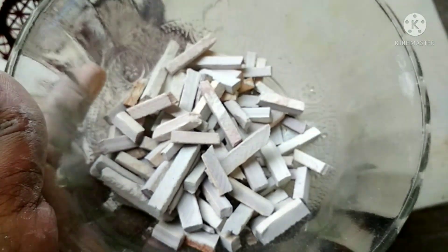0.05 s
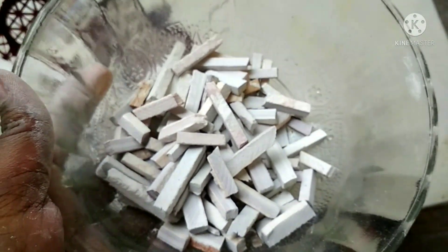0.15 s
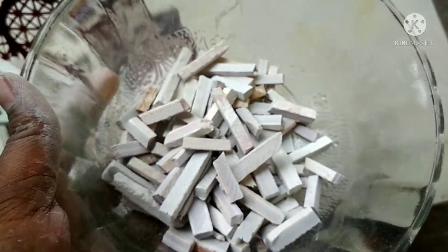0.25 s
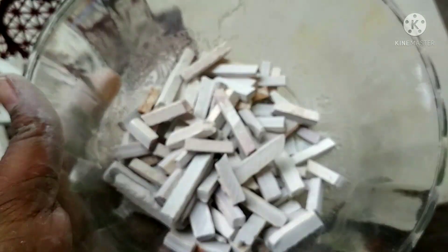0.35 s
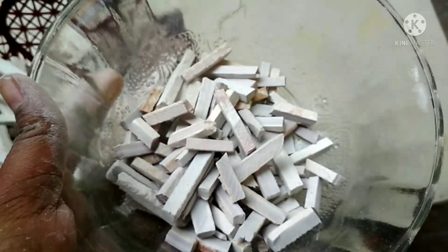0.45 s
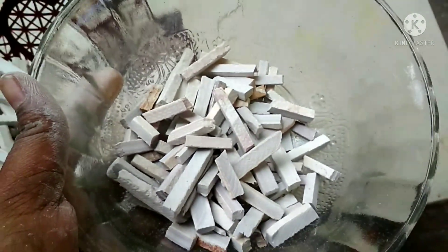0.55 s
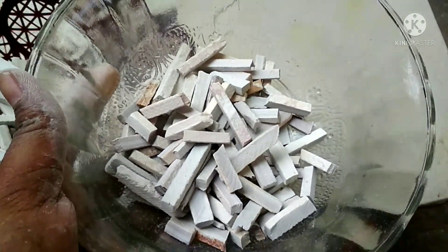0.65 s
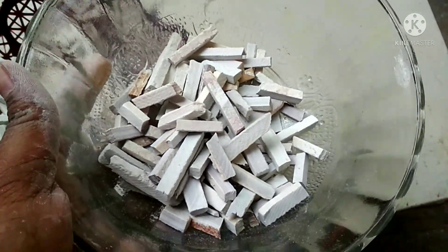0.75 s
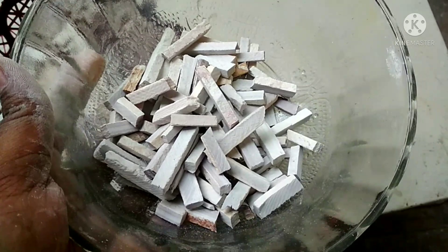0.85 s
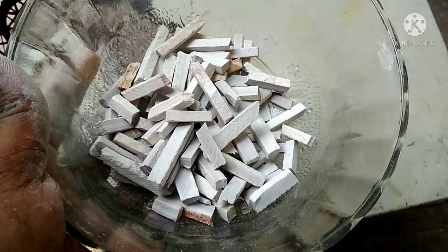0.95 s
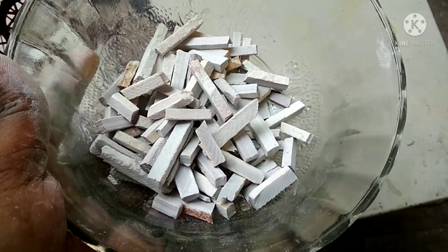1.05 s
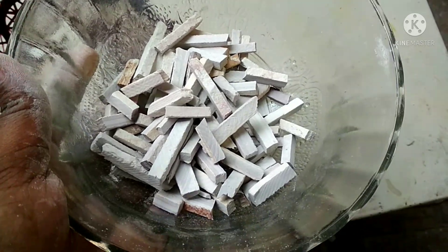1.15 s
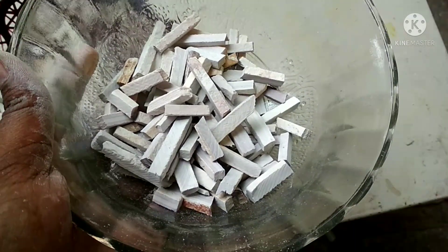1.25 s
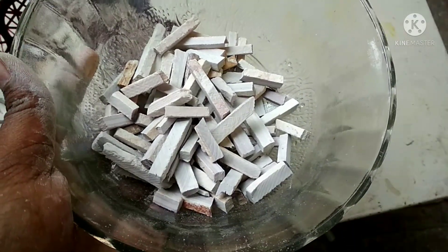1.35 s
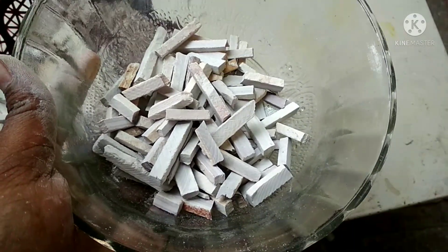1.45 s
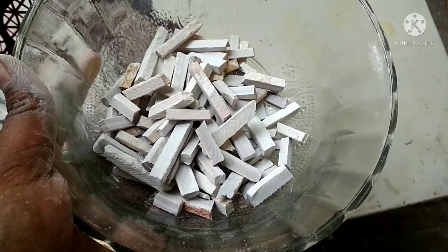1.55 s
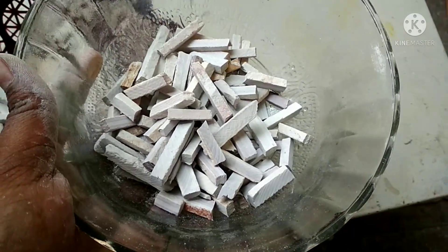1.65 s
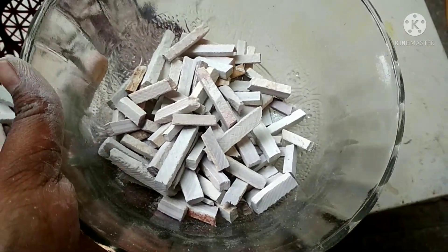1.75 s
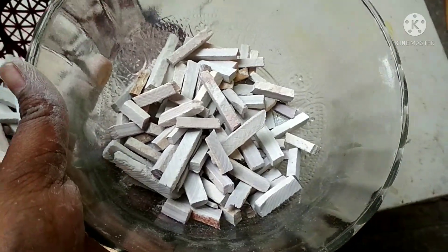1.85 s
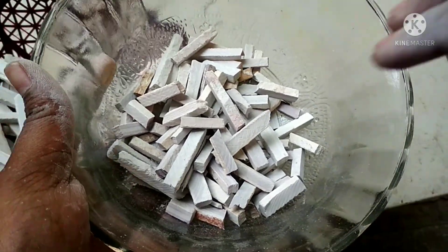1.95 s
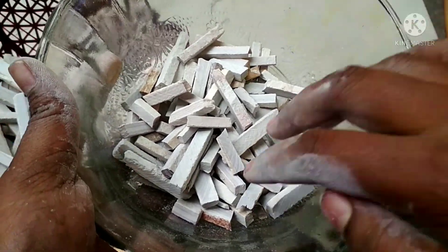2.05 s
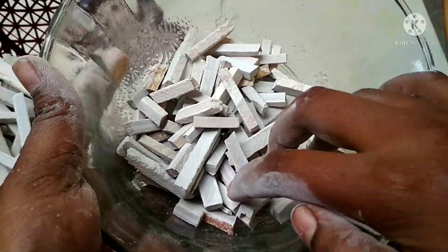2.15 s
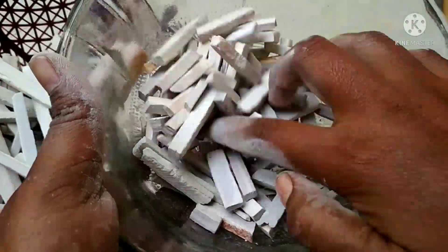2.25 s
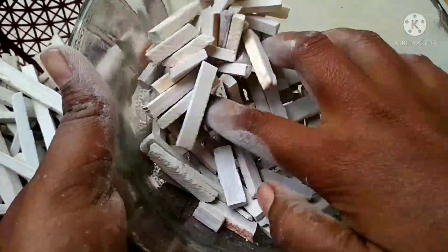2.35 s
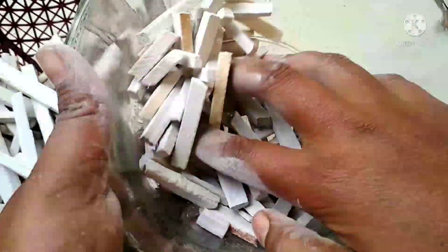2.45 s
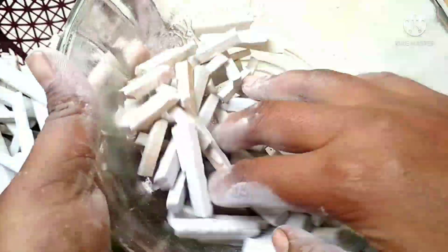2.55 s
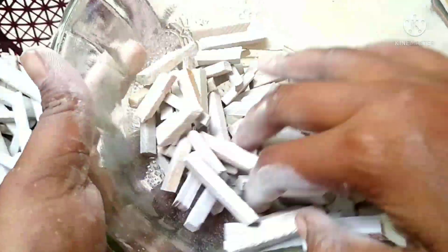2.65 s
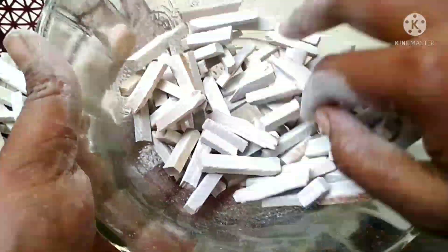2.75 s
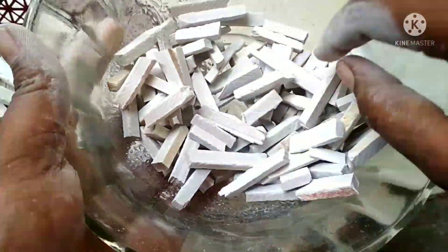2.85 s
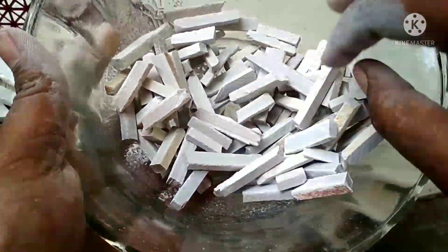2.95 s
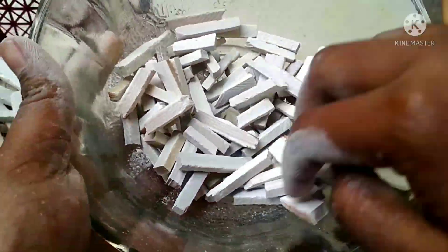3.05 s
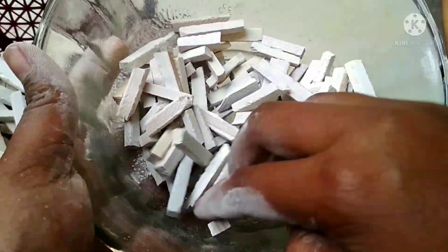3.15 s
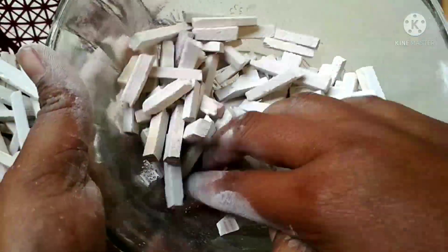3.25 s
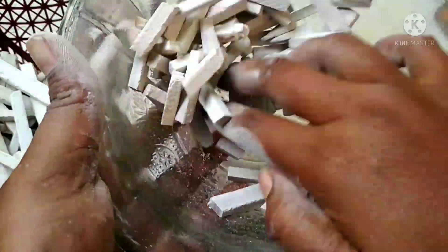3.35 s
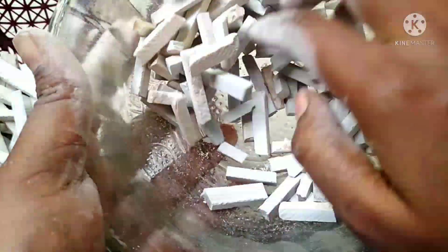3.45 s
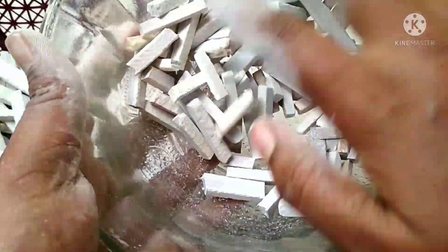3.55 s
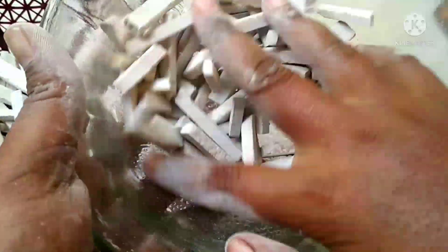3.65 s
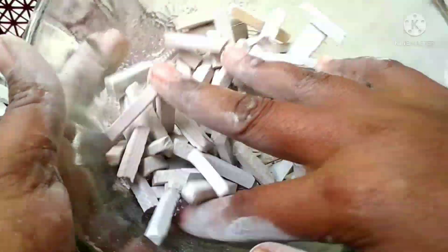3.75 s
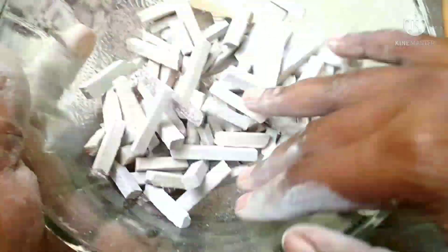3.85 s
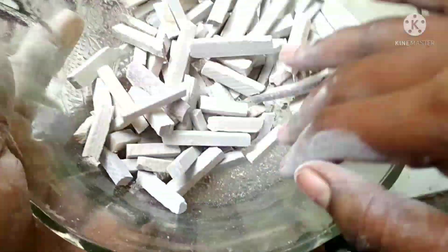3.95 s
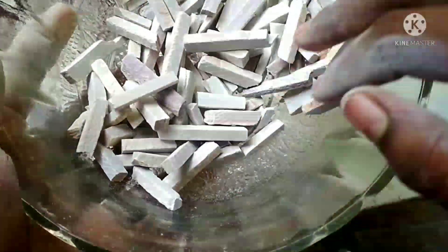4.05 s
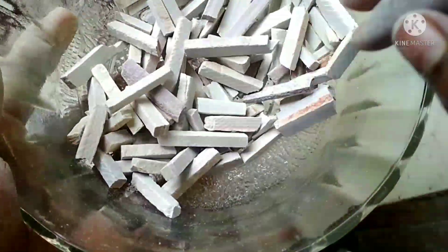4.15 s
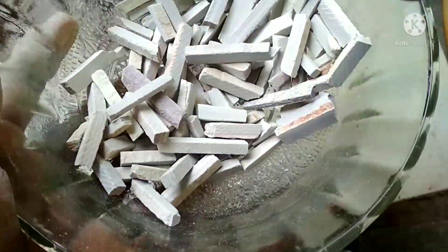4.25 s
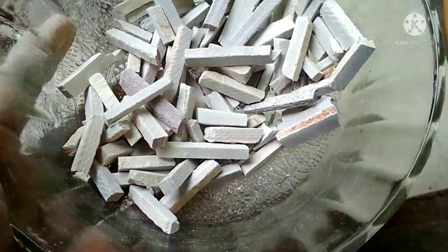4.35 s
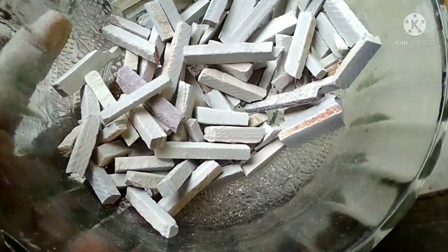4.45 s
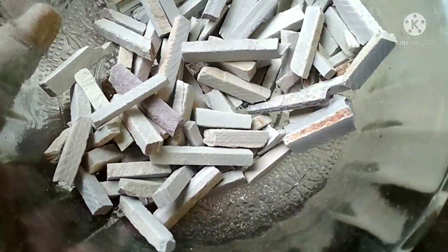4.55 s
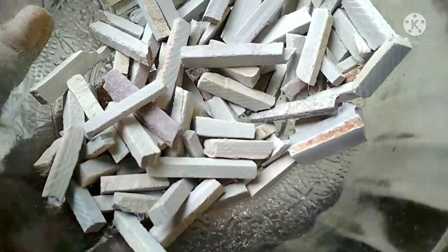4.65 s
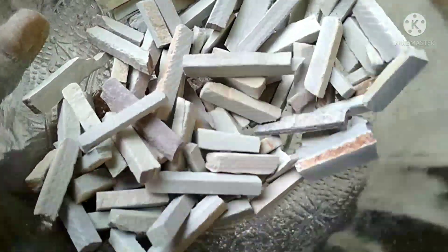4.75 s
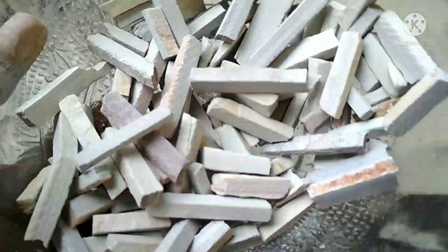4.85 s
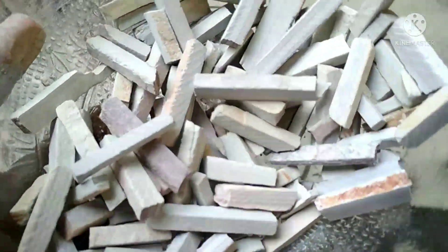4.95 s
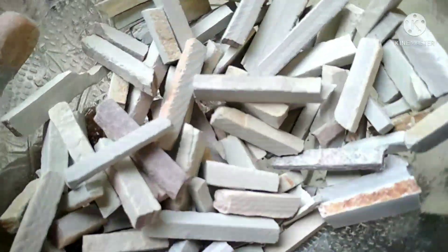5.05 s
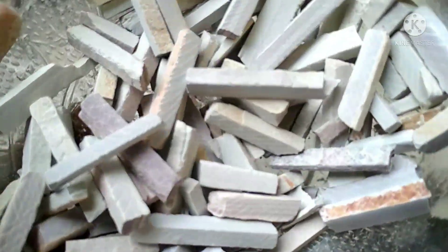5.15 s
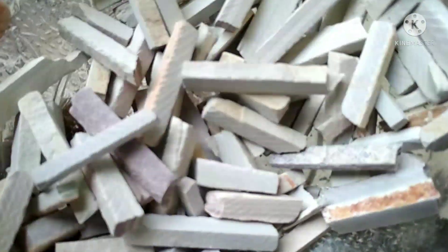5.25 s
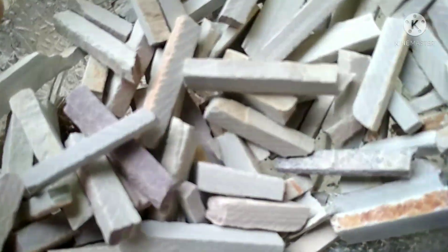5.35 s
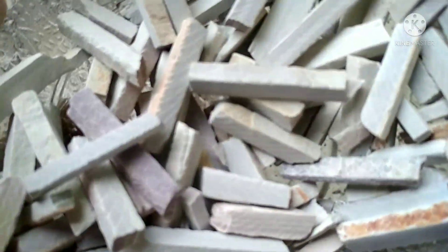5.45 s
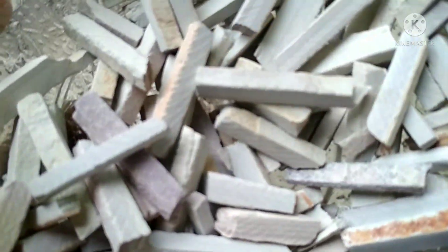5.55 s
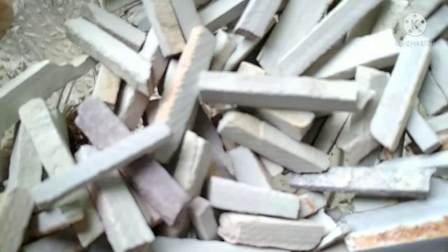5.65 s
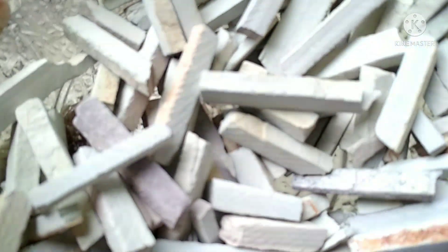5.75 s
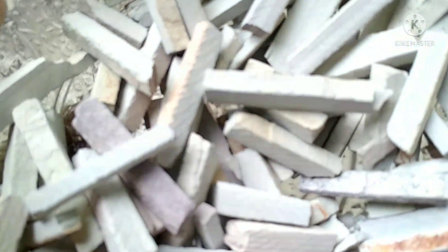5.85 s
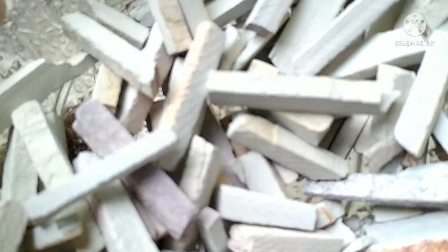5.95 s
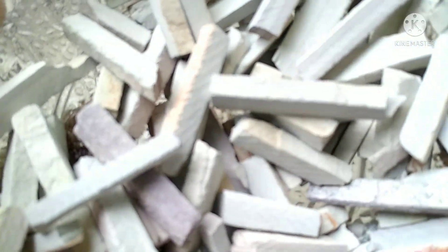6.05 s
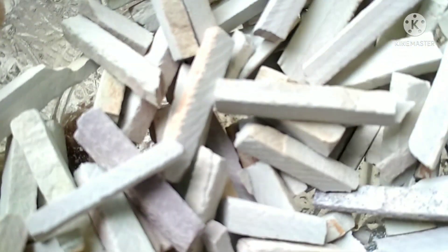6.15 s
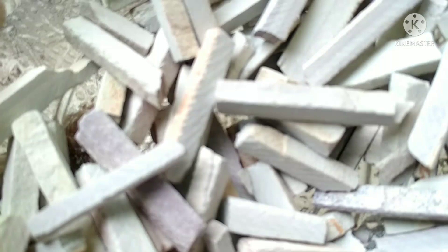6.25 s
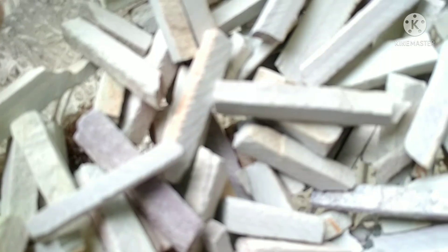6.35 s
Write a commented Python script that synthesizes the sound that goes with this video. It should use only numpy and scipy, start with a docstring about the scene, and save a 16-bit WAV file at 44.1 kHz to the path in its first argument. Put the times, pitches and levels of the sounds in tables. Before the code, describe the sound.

For the first 1.5 seconds there is almost only quiet room air, thin hiss and faint hand rumble, with a tiny tick near 0.7. A slight click at 1.5 precedes delicate, very high clinks from 1.7, mostly left, thickening into a bright rattle around 2.0-2.2. From 2.3 to 3.0 a hand stirs the chalky pieces in the glass bowl: dense dry clatter, sharp clacks, short glassy rings and low drumming, leaning right. After a brief dip near 3.1, a second churn runs to about 4.1, with a strong clack and knock at 3.8. Small slips fade by 4.4. Near-silence follows, broken by a soft thump around 4.7, a couple of clinks at 5.0, a faint tick at 5.4, and a crisp left-sided cluster at 5.6-5.7. Faint ticks and low handling rumble remain to 6.4. Close, dry stereo with a short faint room tail.

```python
"""Chalky slate pencils in a glass bowl, close by in a quiet room: loose pieces clink as the bowl tilts,
a hand stirs the heap twice in a dense clatter with sharp clacks, then the last pieces settle.
Clinks are decaying modes with a puff of grit; clacks and clatter are noise cracks and short modes through
the resonances of the glass; blunt knocks, scrapes, handling thumps, room air and faint tones are shaped noise."""
import sys
import numpy as np
from scipy import signal
from scipy.fft import rfft, irfft, next_fast_len
from scipy.io import wavfile
from scipy.ndimage import uniform_filter1d, map_coordinates

SR = 44100
rng = np.random.default_rng(int(sys.argv[2]) if len(sys.argv) > 2 else 0)


def master(y):
    """Save y as 16-bit WAV."""
    cut = np.clip(np.atleast_2d(y).T, -1, 1)
    pcm = np.round(cut * 32767)  # scale
    wavfile.write(sys.argv[1], SR, pcm.astype(np.int16))


N = 283110


def amp(db):
    """Decibels to gain."""
    return 10 ** (np.asarray(db) / 20)


def unit(x):
    """Scaled to rms 1."""
    return x / np.sqrt(np.mean(x ** 2) + 1e-20)


def along(points, hz):
    """Interpolates (frequency [Hz], value) points on a log frequency axis."""
    point_hz, values = np.transpose(points)
    return np.interp(np.log(hz + 1), np.log(point_hz + 1), values)


def curve(points):
    """Interpolates (time [s], level [dB]) points to one value per sample."""
    times, levels = np.transpose(points)
    return np.interp(np.arange(N) / SR, times, levels)


def filtered(x, response):
    """Multiplies the spectrum of x by a complex response of frequency."""
    n = x.shape[-1]
    padded = 2 * next_fast_len(n // 2 + 2048)  # even length with space for the tail
    return irfft(rfft(x, padded) * response(np.fft.rfftfreq(padded, 1 / SR)), padded)[..., :n]


def colour(x, spectrum):
    """Causal minimum-phase filter with the shape (frequency [Hz], level [dB])."""
    def response(hz):
        cepstrum = irfft(np.log(amp(along(spectrum, hz))))
        # folding the cepstrum to positive time makes the filter causal
        fold = np.r_[1, np.full(len(hz) - 2, 2), 1, np.zeros(len(hz) - 2)]
        return np.exp(rfft(cepstrum * fold))
    return filtered(x, response)


def sides(pan_db):
    """Left and right gains with a mean of 1, from the left-minus-right level."""
    gains = amp(np.array([pan_db, -pan_db]) / 2).reshape(2, -1)
    return gains / gains.mean(axis=0)


def add(track, s, sound, db, pan_db):
    """Places a stereo hit at its time, peak level and side."""
    part = track[:, round(s * SR):][:, :sound.shape[1]]
    peaks = np.abs(sound).max(axis=1, keepdims=True)
    hit = amp(db) * sides(pan_db) * sound / peaks
    part += hit[:, :part.shape[1]]


def wobble(rate):
    """A smooth random curve with the given number of knots a second."""
    knots = rng.standard_normal(int(N * rate / SR) + 4)
    return map_coordinates(knots, [np.arange(N) * rate / SR])


def patchy(spectrum, depth_db):
    """Stereo noise of rms 1 whose colour drifts in patches of time and frequency."""
    z = signal.stft(rng.standard_normal((2, N)), nperseg=512)[2]
    field = uniform_filter1d(rng.standard_normal(z.shape[1:]), size=5, axis=0)
    field = uniform_filter1d(field, size=26, axis=1)
    drifting = signal.istft(z * amp(depth_db * unit(field)), nperseg=512)[1][:, :N]
    return unit(colour(drifting, spectrum))


# spectra of the room air and of the thin hiss: (frequency [Hz], relative level [dB per Hz])
ROOM_AIR_SPECTRUM = [(88, -37), (150, 7.5), (588, -8.5), (880, -12), (1160, -15), (1340, -18), (2890, -21),
                     (7000, -27), (9100, -51), (15400, -120)]
HISS_SPECTRUM = [(3000, -42.5), (7000, -19.5), (10000, 1.5), (12000, 2), (15500, -7)]


def background(air_db=-72, air_drift_db=4.5, hiss_db=-69, hiss_fall_db_per_s=0.94, hiss_drift_db=5.5):
    """Room air and a thin hiss that slowly sinks, both noise of drifting colour."""
    air = amp(air_db) * patchy(ROOM_AIR_SPECTRUM, air_drift_db)
    hiss_gain = amp(hiss_db - hiss_fall_db_per_s * np.arange(N) / SR)
    return air + hiss_gain * patchy(HISS_SPECTRUM, hiss_drift_db) * sides(pan_db=0.5)


# tones that come and go in the background, and a brief broad swell of noise at the start: # (start [s], length
# [s], centre [Hz], half-width to 1/e [Hz], relative level [dB])
BACKGROUND_TONES = [(0, 0.068, 1970, 1140, -67), (0, 0.27, 5120, 100, -80), (0, 0.1, 4200, 100, -76),
                    (0.472, 0.12, 599, 53.7, -64.5), (0.502, 0.12, 1495, 70, -76.5),
                    (0.55, 0.27, 7500, 300, -76.5), (0.806, 0.15, 6020, 150, -81.5),
                    (0.417, 0.98, 2930, 75.5, -78.5), (0.736, 0.35, 1171, 52.5, -74.5),
                    (1.779, 0.24, 1133, 110, -73), (1.145, 0.24, 1700, 98, -77),
                    (4.327, 0.26, 2940, 70.4, -75.5), (4.655, 0.25, 1934, 55.2, -70.5),
                    (4.94, 0.93, 5150, 120, -76), (5.004, 0.87, 4100, 126.7, -84),
                    (4.978, 0.049, 1676, 80.7, -66.5), (5.177, .12, 567, 54.7, -66.5),
                    (5.32, .23, 827, 79.6, -56), (6.106, 0.27, 745, 55.4, -72)]


def faint_tones(level_db=-1):
    """Barely audible bands of noise swell and fade: mostly narrow fuzzy tones, one broad swell at the start."""
    out = np.zeros((2, N))
    for s, length, centre_hz, width_hz, db in BACKGROUND_TONES:
        size = int(length * SR)
        band = lambda hz: np.exp(-((hz - centre_hz) / width_hz) ** 2)
        fuzz = unit(filtered(rng.standard_normal((2, size)), band))
        swell = np.sin(np.pi * np.arange(size) / size)
        part = out[:, int(s * SR):][:, :size]
        part += (amp(db + level_db) * swell * fuzz)[:, :part.shape[1]]
    return out


# rumble of the holding hand: (time [s], relative level [dB])
GRIP_RUMBLE = [(0, -67), (1.4, -69), (2.2, -73), (4.3, -66.5), (5.0, -55.5), (5.45, -63.5), (6.4, -58)]
# low handling thumps, many close on the left microphone; a fade below half the rise time is played
# as half the rise time:
# (time [s], relative level [dB], time to fade by 20 dB [s], left minus right [dB])
HANDLING_THUMPS = [(1.771, -48, 0.04, 31.5), (1.891, -51, 0.2, 23), (2.041, -51.5, 0.7, 17.5),
                   (2.159, -51, 0.34, 25), (2.412, -32, -0.05, -13.5), (2.529, -38.5, 0.15, 3),
                   (2.657, -36.5, -0.06, 16.5), (2.95, -47.5, 0.74, 20.5), (3.205, -35, 0.16, 24),
                   (3.291, -27.5, 0.06, 29), (3.47, -42, -0.34, 19), (3.68, -42, 0.04, 22),
                   (3.826, -31.5, 0.04, -13), (4.4, -57, 0.15, 13), (4.685, -33.5, 0.04, 32),
                   (4.8, -44, 0.27, 29), (5.62, -41, 0.12, 31), (5.82, -43, 0.17, 21),
                   (5.941, -45.5, 0.2, 20.5)]
# spectrum of the thuds: (frequency [Hz], relative level [dB per Hz])
THUMP_SPECTRUM = [(15, -19.5), (30, -3.5), (45, -2), (85, -4), (130, -5.5), (190, -22), (400, -38.5),
                  (1000, -59), (3000, -110)]
THUMP_RISE_S = 0.05  # to swell by 20 dB


def handling(level_db=1, push_db=-54, push_growth=0.27):
    """Low noise thuds of handling: the grip, the push of the stirring hand and single thumps."""
    t = np.arange(N) / SR
    grip = amp(curve(GRIP_RUMBLE)) * sides(pan_db=2.5)
    power = grip ** 2 + following(push_db, push_growth) ** 2
    for s, db, fade, pan_db in HANDLING_THUMPS:
        swell_db = -20 * np.maximum((s - t) / THUMP_RISE_S, (t - s) / max(fade, THUMP_RISE_S / 2))
        power += (amp(db + np.maximum(swell_db, -80)) * sides(pan_db)) ** 2
    rumble = unit(colour(rng.standard_normal((2, N)), THUMP_SPECTRUM))
    return amp(level_db) * np.sqrt(power) * rumble


def crack(t, t60, alike):
    """A decaying noise burst, as of crumbling grit at a contact, partly shared by both sides."""
    shared, left, right = rng.standard_normal((3, len(t)))
    noise = np.sqrt(alike) * shared + np.sqrt(1 - alike) * np.array([left, right])
    return noise * amp(-60 * t / t60)


def ring(t, hz, db, t60):
    """Decaying sine modes; each reaches the two sides in its own phase."""
    phase = rng.uniform(0, 2 * np.pi, (2, len(hz), 1))
    modes = amp(db)[:, None] * np.sin(2 * np.pi * hz[:, None] * t + phase)
    return np.sum(modes, axis=1) * amp(-60 * t / t60)


# puff of grit at a touch: (frequency [Hz], relative level [dB per Hz])
GRIT_SPECTRUM = [(1000, -43.5), (3300, -39), (4200, -15.5), (5000, -10), (5700, -36.5), (7000, -38.5),
                 (8000, -6.5), (11000, -4), (13000, 15)]


def pencil(t, hz, db, crack_db, t60, scatter_db=4):
    """One touch of a loose pencil: modes of scattered strength and a puff of grit, softly started."""
    tone = ring(t, hz, db + rng.normal(0, scatter_db, len(hz)), t60)
    grit = colour(crack(t, t60=0.043, alike=0.11), GRIT_SPECTRUM)
    return (1 - np.exp(-(t / 0.00042) ** 2)) * (tone + amp(crack_db) * grit)


# ringing of a loose pencil, before detuning and scatter: (frequency [Hz], relative level [dB])
PENCIL_MODES = [(4850, -21), (7900, -7), (8890, -5), (9560, -16.5), (12530, 9.5), (12900, 2), (13500, -0.5),
                (13900, 2.5), (14300, 4.5), (15300, 0.5)]
# single pieces tipping over: (time [s], relative peak [dB], left minus right [dB], main ring [Hz],
# lower ring [Hz], lower ring relative to the main one before scatter [dB], ring t60 [s])
TIPPING_PIECES = [(.713, -50.5, 13, 12870, 7910, -8, 0.054), (1.6235, -42, 34, 14100, 8700, -16, 0.046),
                  (1.7345, -37.5, 25, 12440, 8660, -17, 0.052), (1.7614, -31, 26, 13330, 8600, -30, 0.046),
                  (1.798, -38, 17, 13600, 8600, -13, 0.036), (1.8083, -35, 20, 13800, 8540, -15, 0.027),
                  (1.84, -25, 15, 13440, 8420, -16, 0.062), (1.8672, -23.5, 17, 14100, 8830, -6, 0.061),
                  (1.918, -41, 7, 12640, 8060, -14, .04), (1.9572, -33, 15, 12840, 7770, -14, 0.07),
                  (2.0339, -12, 4.5, 12530, 8640, -21, 0.037), (2.037, -17, 7, 13840, 7700, -21, 0.032),
                  (2.052, -32, 4, 13900, 7860, -6, 0.09), (2.077, -28, 5, 9030, 4950, -11, 0.025),
                  (2.0814, -19.5, 2, 12550, 8600, -20, 0.1), (2.0993, -20, 8, 13800, 7900, -12.5, 0.069),
                  (2.1096, -19, 21, 12330, 8000, -19, 0.033), (2.119, -22, 10, 13600, 7600, -22, 0.12),
                  (2.1355, -16, 5, 15440, 8500, -46.5, 0.051),
                  (2.1666, -24.5, 6, 13850, 8100, -15.5, 0.036),
                  (4.4533, -32.5, 5, 13170, 8360, -11, 0.036),
                  (4.886, -31.5, 16.5, 12570, 9530, -29, 0.024), (4.9845, -19, 5, 14660, 8970, -12, 0.05),
                  (5.007, -20.5, 7, 14540, 8240, -14.5, 0.043), (5.574, -19, 9, 15200, 9000, -6, 0.016),
                  (5.6028, -18, 16, 15600, 8450, -23, 0.026), (5.6165, -25, 11, 12400, 9560, -9, 0.03),
                  (5.641, -23, 12, 12900, 7980, -16, 0.05), (5.661, -18, 11, 13500, 9620, -22, .022),
                  (5.695, -13, 14, 14400, 8830, -21.5, 0.065), (5.707, -25, 20, 12630, 9000, -13, 0.097),
                  (5.719, -28, -4, 14400, 9440, -6, 0.044), (5.7887, -44, 9, 13020, 8730, -21, 0.042),
                  (5.8481, -43, -6, 12270, 9600, 1, 0.05), (6.0762, -47, 6, 12230, 8870, -4, 0.052)]


def clinks(level_db=4, crack_db=3, detune=0.004, bounce_db=-9, own_ring_db=17, touch_s=0.00041):
    """A loose pencil rings at its own two pitches, wakes those it lies on, and bounces to rest."""
    out, t = np.zeros((2, N)), np.arange(SR // 10) / SR
    hz, db = np.transpose(PENCIL_MODES)
    for s, peak_db, pan_db, main_hz, low_hz, low_db, t60 in TIPPING_PIECES:
        neighbours_hz = hz * (1 + detune * rng.standard_normal(len(hz)))
        pitch = np.r_[main_hz, low_hz, neighbours_hz]
        levels = np.r_[own_ring_db, own_ring_db + low_db, db]
        for bounce in range(3):
            touch = (1 - np.exp(-t / touch_s)) * pencil(t, pitch, levels, crack_db, t60)
            when = s + bounce * rng.uniform(0.0011, 0.0044)
            add(out, when, touch, peak_db + level_db + bounce * bounce_db, pan_db)
    return out


def lingering_hiss(x, level_db=-12.5, ceiling_db=-43, t60=0.62):
    """A soft hiss hangs on after contacts and dies away; a ceiling limits what hard contacts leave."""
    power = np.abs(uniform_filter1d(np.mean(x ** 2, axis=0), size=256))
    keep = amp(-120 / (t60 * SR))  # power kept per sample
    held = signal.lfilter([1 - keep], [1, -keep], np.minimum(power, amp(ceiling_db) ** 2))
    return amp(level_db) * np.sqrt(held) * patchy(HISS_SPECTRUM, depth_db=5.5)


# decay of the room: (frequency [Hz], t60 [s])
ROOM_DECAY = [(200, 0.34), (2000, 0.41), (9000, 0.48), (15000, .1)]


def room(x):
    """A diffuse noise tail, each frequency dying at its own speed."""
    hz, t, z = signal.stft(rng.standard_normal((2, SR // 2)), SR, nperseg=256)
    decay = amp(-60 * t / along(ROOM_DECAY, hz)[:, None])
    tail = signal.istft(z * decay, SR, nperseg=256)[1]
    return signal.fftconvolve(x, tail / np.linalg.norm(tail[0]), axes=1)[:, :N]


def contact(t, t60, ring_t60, ring_db, count=3):
    """A piece wedged in the heap: a crack and a few short modes of random pitch."""
    life = ring_t60 * rng.uniform(.5, 1.5)
    tone = ring(t, rng.uniform(3500, 14500, count), rng.normal(ring_db, 1.1, count), life)
    onset = 1 - np.exp(-t / .00015)
    return (crack(t, t60, alike=0.051) + tone) * onset


# resonances of the loaded bowl, before detuning and scatter: (centre [Hz], width [Hz], level [dB])
BOWL_RESONANCES = [(860, 450, -2), (2280, 18, 13), (3980, 65, 14), (5770, 91, 8), (5960, 130, 13.5),
                   (7680, 10.14, -0.5), (8800, 110, 5.5), (8840, 30, 5), (9800, 91, -0.5), (10220, 38, 8),
                   (10697, 190, 4.5), (11670, 34, 5.5), (11180, 84, 4.5), (11980, 270, 9)]


def bowl(x, detune=0.0074, scatter_db=4.5):
    """Contacts heard directly and through glass resonances that shift with the lie of the heap."""
    modes = []
    for centre, width, db in BOWL_RESONANCES:
        shifted = centre * (1 + detune * rng.standard_normal())
        modes.append((shifted, width, db + scatter_db * rng.standard_normal()))

    def response(f):
        return 1 + sum(amp(db) * 1j * f * w / (c * c - f * f + 1j * f * w) for c, w, db in modes)
    return filtered(x, response)


def note(t, hz, t60):
    """One decaying mode with a soft start."""
    return (1 - np.exp(-t / .0006)) * ring(t, np.array([hz]), np.zeros(1), t60)


# pieces snapping against each other and the glass: (time [s], relative peak [dB], left minus right [dB],
# crack t60 [s], body tilt near 5 kHz [dB], top tilt above 12 kHz [dB], note [Hz])
HARD_COLLISIONS = [(1.5021, -27, 1, 0.033, -3, -3, 9730), (2.263, -12.5, -6, 0.015, -9, -6, 9910),
                   (2.346, -14.5, -9, 0.012, 5, 6, 10200), (2.362, -14.5, -3.5, 0.013, 0.5, 1, 9960),
                   (2.369, -19.5, -5.5, 0.012, 2, 3.5, 12450), (2.381, -12.5, -6, 0.04, 6, 0.5, 10110),
                   (2.392, -8.5, -4.5, 0.025, -1.5, 0.5, 10040), (2.426, -10, -5.5, 0.03, 3.5, 2, 6090),
                   (2.4435, -10, -11.5, 0.015, -4, -1, 8770), (2.476, -15, -10, 0.011, 1, 0.5, 11880),
                   (2.5327, -4, -6, 0.0065, 4, 10, 13340), (2.597, -16, -8.5, 0.02, -2.5, 2, 8760),
                   (2.6128, -15.5, -8, 0.025, 1, -1.5, 10210), (2.678, -12.5, -8, 0.012, -4, -6, 12390),
                   (2.6923, -9, -6.5, 0.023, 2, 2, 12400), (2.748, -11, -6.5, 0.018, 6.5, -3, 2360),
                   (2.7721, -16, -8, 0.018, -3, -2, 6080), (2.8109, -11.5, -13, 0.013, -4, -4.5, 8300),
                   (2.8247, -8, -13, 0.015, -6.5, -5.5, 10190), (2.832, -25.5, -12, 0.0084, -7, -3, 10230),
                   (2.8456, -13, -16.5, 0.012, -6.5, -0.5, 11530), (2.8662, -19, -12, 0.012, -3, -2, 11670),
                   (2.914, -17, -15, 0.019, 5, -16, 6150), (3.029, -26, -15, 0.0091, 7, -10, 5800),
                   (3.152, -14.5, -8, 0.011, -1, 6, 12880), (3.1956, -6.5, -16, 0.0038, -11.5, -0.5, 11750),
                   (3.24, -9.5, -11.5, 0.012, 5, 2, 10830), (3.269, -17.5, -10, 0.015, 9.5, 0.5, 10230),
                   (3.3026, -11.5, -12, 0.02, 1, -1.5, 10220), (3.335, -19.5, -7.5, 0.02, 0.5, -1, 10240),
                   (3.35, -11.5, -12.5, 0.011, -5, 2.5, 9150), (3.371, -15, -3, 0.012, -6, 8.5, 10150),
                   (3.462, -19, -6, 0.049, 5, -1, 10070), (3.4765, -20, -11, 0.011, -1, -2.5, 11230),
                   (3.482, -18, -8.5, 0.008, 3.5, 2, 10250), (3.503, -16, -14.5, 0.017, 3, -3, 6010),
                   (3.5285, -21.5, -5.5, 0.006, -2, -1.5, 10690),
                   (3.555, -21, -16.5, 0.017, 6, -5.5, 10960), (3.57, -23.5, -4, 0.0064, 7.5, -1, 10730),
                   (3.5816, -21, -9, 0.008, 0, 1, 5936), (3.594, -23.5, -15.5, 0.02, 9.5, -2.5, 5950),
                   (3.632, -11, -16.5, 0.017, 3, -3, 6110), (3.655, -18, -0.5, 0.014, -1.5, 12, 13880),
                   (3.668, -21, -8.5, 0.0095, 2.5, 0, 6050), (3.6769, -12, -11.5, 0.02, 7, 3, 5640),
                   (3.7303, -14.5, -14.5, 0.018, -3.5, -3, 11880),
                   (3.748, -20, -14, 0.016, -7.5, 0.5, 10750), (3.766, -16.5, -11, 0.02, 0.5, -1.5, 10190),
                   (3.815, -3, 3, 0.02, -0.5, 2, 3946), (3.8388, -15, 3, 0.01, 6.5, 5.5, 5850),
                   (3.898, -18, 8, 0.006, -2, -9, 2340), (3.9172, -15, -13.5, 0.019, 11, 0, 10660),
                   (3.937, -8.5, -14, 0.02, 0, -6.5, 9900), (3.967, -8, -13, 0.018, -2, -2.5, 10210),
                   (3.992, -17.5, -7, 0.015, 6, -7.5, 12320), (4.0072, -10, -16, 0.039, -4.5, 4, 10220),
                   (4.0707, -15.5, -26, 0.015, 9.5, -5, 10230), (4.1243, -26.5, -11, 0.0068, 5, -4, 10260),
                   (4.186, -41.5, -10, 0.0092, 13, 1, 8600), (4.239, -33.5, -8, 0.008, 5, 0, 2280),
                   (4.278, -35, -18, 0.01, 8, 7, 2360), (4.301, -28, -14, 0.012, -13, -2, 11800),
                   (4.3826, -45.5, 15, 0.022, 2, 7, 2970), (5.4216, -25.5, -12, 0.016, -11.5, -7, 10420)]
# colour of a hard collision: (frequency [Hz], relative level [dB per Hz])
SNAP_SPECTRUM = [(200, -31.5), (900, -9.5), (2200, -21.5), (3200, -28), (4600, -25), (7500, -10.5),
                 (9000, -2.5), (10500, 0), (12500, -8), (14000, -7), (15500, -3)]
# low notes of a clack ring more weakly: (frequency [Hz], relative level [dB])
CLACK_NOTE_LEVEL = [(2300, -12.5), (6000, -6), (9000, -1)]


def clacks(level_db=0.7, ring_db=-13, grind_db=-21, grind_s=0.004, note_db=-14, note_t60=0.077):
    """The hardest collisions snap with their own colour and note; pieces grind briefly around each."""
    out, t = np.zeros((2, N)), np.arange(SR // 12) / SR
    lead = SR // 100  # samples of grinding ahead of the snap
    for s, peak_db, pan_db, t60, body_db, top_db, note_hz in HARD_COLLISIONS:
        snap = contact(t, t60, 2 * t60, ring_db)
        snap = np.pad(snap, ((0, 0), (lead, 0)))[:, :len(t)]
        grind_gain = amp(grind_db) * np.exp(-np.abs(t - lead / SR) / grind_s)
        grind = grind_gain * rng.standard_normal(snap.shape)
        tilt = [(1500, 0), (4000, body_db), (6500, body_db), (8500, 0), (11500, 0), (12800, top_db)]
        clack = colour(colour(bowl(snap + grind), SNAP_SPECTRUM), tilt)
        add(out, s - lead / SR, clack, peak_db + level_db, pan_db)
        ring_level = peak_db + note_db + along(CLACK_NOTE_LEVEL, note_hz)
        add(out, s, note(t, note_hz, note_t60), ring_level, pan_db)
    return out


# blunt low knocks, some of them fingers close on the left microphone:
# (time [s], relative peak [dB], left minus right [dB],
# bass before the common lift [dB], brightness before the common lift [dB], note [Hz])
BLUNT_KNOCKS = [(1.503, -38.5, -12, -45, -16, 900), (2.038, -28, 37, -12.5, -16, 716),
                (2.117, -27.5, 38, -4, -8, 1310), (2.387, -27.5, -5.5, -11, -17.5, 1060),
                (2.393, -11.5, -10, -13, -21.5, 340), (2.445, -22, -4.5, -7.5, -10.5, 880),
                (2.534, -28.5, 8, -28.5, -13, 1100), (2.697, -28.5, -0.5, -26, -28, 1060),
                (2.742, -37, -1, -28, -12, 2282), (2.825, -25, -20, -16.5, -13, 1100),
                (3.241, -31, -8.5, -21, -13, 930), (3.279, -22, -5.5, -21.5, -24.5, 1060),
                (3.414, -28, -1.5, -26.5, -26, 940), (3.535, -34, -5, -29, -15, 1000),
                (3.747, -32, -6.5, -24.5, -20.5, 930), (3.816, -11.5, -12, -19, -18, 930),
                (3.949, -29.5, -8, -14.5, -22, 1000), (4.187, -46, -11, -30, -17, 950),
                (4.3, -39.5, -5, -36, -13, 1050), (5.422, -37.5, 2, -46, -22, 1600),
                (5.5742, -29, 31, -12, -11.5, 2400), (5.6955, -21, 33, -8.5, -13, 1570),
                (5.703, -41.5, 22, -3, -17, 1130), (5.865, -43, 9, -19, -19, 1500)]
# spectrum of a blow before its tilt: (frequency [Hz], relative level [dB per Hz])
KNOCK_SPECTRUM = [(60, -20.5), (170, -10.5), (270, 3.5), (500, 1.5), (1000, -8), (1800, -7), (3200, -19),
                  (6000, -18.5), (12000, -21.5)]


def knocks(level_db, bass_lift_db=8, bright_lift_db=14, note_db=-15, note_t60=0.044):
    """Blunt noise blows, each with its own tilt and a brief note."""
    out, t = np.zeros((2, N)), np.arange(SR // 12) / SR
    for s, peak_db, pan_db, bass_db, bright_db, note_hz in BLUNT_KNOCKS:
        blow = colour(crack(t, t60=0.02, alike=0.72), KNOCK_SPECTRUM)
        tilt = [(350, bass_db + bass_lift_db), (900, 0), (1700, bright_db + bright_lift_db)]
        add(out, s, colour(blow, tilt), peak_db + level_db, pan_db)
        add(out, s, note(t, note_hz, note_t60), peak_db + note_db, pan_db)
    return out


# neighbours chatter around a falling piece:
# (start [s], length [s], rms over that length [dB], left minus right [dB])
CHATTER_SPELLS = [(1.723, 0.11, -61, 21), (2.026, 0.12, -33, 9), (5.574, .15, -29, 12),
                  (2.265, .035, -38, 1.5), (3.115, 0.029, -48, 1), (5.859, 0.052, -61, 0)]


def rattles(detune=0.016, spread_db=14, crack_db=2, count=14, t60=0.05):
    """Light, quick touches of neighbouring pencils fill the gaps between the clinks."""
    out, t = np.zeros((2, N)), np.arange(SR // 20) / SR
    hz, db = np.transpose(PENCIL_MODES)
    for start, length, level_db, pan_db in CHATTER_SPELLS:
        spell = np.zeros((2, N))
        for when, size in rng.random((count, 2)):
            pitch = hz * (1 + detune * rng.standard_normal(len(hz)))
            touch = pencil(t, pitch, db, crack_db, t60)
            add(spell, start + length * when, touch, -spread_db * size, pan_db)
        out += amp(level_db) * np.sqrt(length * SR / N) * unit(spell)
    return out


# pieces slide a little way: (start [s], length [s], level [dB], left minus right [dB])
SHORT_SLIDES = [(1.73, 0.31, -62, 14), (2.062, 0.17, -48, 7), (4.1, 0.47, -63.5, -2),
                (4.976, 0.18, -61.5, 8), (5.58, 0.16, -52, 23), (5.692, 0.065, -55, -2),
                (5.831, 0.1, -58, 2)]
# a pencil sliding on the glass: (frequency [Hz], relative level [dB per Hz])
SCRAPE_SPECTRUM = [(300, -21), (1000, -1.5), (2800, -22), (4700, -1.5), (6500, -31.5), (8500, 1),
                   (10500, -1.5), (13000, 5.5)]


def slides(grain_db=3):
    """Dry faces slip over the glass: grainy noise that swells and fades."""
    gain, t = np.zeros((2, N)), np.arange(N) / SR
    for s, length, db, pan_db in SHORT_SLIDES:
        gain += amp(db) * sides(pan_db) * np.sin(np.pi * np.clip((t - s) / length, 0, 1))
    grit = rng.standard_normal((2, N)) * amp(grain_db * wobble(rate=700))
    return gain * unit(colour(grit, SCRAPE_SPECTRUM))


# two sweeps of the hand through the heap, each a list of (time [s], effort [dB])
HAND_SWEEPS = [
    [(2.275, -37.5), (2.325, -51.5), (2.365, -25), (2.45, -26.5), (2.51, -33.5), (2.7, -31.5), (2.83, -31),
     (2.97, -41), (3.07, -73)],
    [(3.16, -40), (3.26, -26.5), (3.36, -25), (3.42, -33), (3.52, -30), (3.7, -38.5), (3.83, -25.5),
     (3.97, -28.5), (4.08, -35), (4.16, -55), (4.29, -57.5), (4.4, -78)],
]
SWEEP_FADE_DB_PER_S = 1500  # as the fingers enter and leave the heap
USUAL_EFFORT_DB = -30.5  # steady stirring
FLURRY_DB, FLURRY_S = -25, 0.0092  # a clack jostles its neighbours: relative level, decay time


def effort():
    """Agitation of the heap in dB: the sweeps of the hand, and a flurry after each clack."""
    t = np.arange(N) / SR
    power = np.zeros(N)
    for s, peak_db, *_ in HARD_COLLISIONS:
        power[round(s * SR)] = amp(peak_db + FLURRY_DB) ** 2
    power = signal.lfilter([1], [1, -np.exp(-2 / (FLURRY_S * SR))], power)
    for sweep in HAND_SWEEPS:
        outside = np.abs(t - np.clip(t, sweep[0][0], sweep[-1][0]))  # seconds before or after the sweep
        power += amp(curve(sweep) - SWEEP_FADE_DB_PER_S * outside) ** 2
    return 10 * np.log10(power + 1e-20)


def following(db, growth):
    """Gain of a layer: the given level at the usual effort, growing by a share of each further dB."""
    return amp(db + growth * (effort() - USUAL_EFFORT_DB))


def swarm(strike, per_second, spread_db, rub_db, alike=.2):
    """Collisions at random moments and strengths over the rubbing noise of dry faces."""
    start, end = HAND_SWEEPS[0][0][0], HAND_SWEEPS[-1][-1][0]
    count, out = int(per_second * (end - start)), np.zeros((2, N))
    for when, size, side in rng.random((count, 3)):
        add(out, start + (end - start) * when, strike(), -spread_db * np.sqrt(size), 12 * (side - .5))
    moving = (np.arange(N) > start * SR) & (np.arange(N) < end * SR)
    shared, separate = rng.standard_normal(N), rng.standard_normal((2, N))
    rub = np.sqrt(alike) * shared + np.sqrt(1 - alike) * separate
    return unit(out) + amp(rub_db) * unit(moving * rub)


def shifting_bowl(x, size=4096):
    """The bowl under a moving heap: each overlapping moment rings it anew."""
    out, window = np.zeros((2, N + 2 * size)), np.hanning(size)
    for i in range(0, N - size, size // 2):
        if x[:, i:i + size].any():
            moment = np.pad(x[:, i:i + size] * window, ((0, 0), (0, size)))
            out[:, i:i + 2 * size] += bowl(moment)
    return out[:, :N]


# spectra of the scuffing pieces and of the drumming heap: (frequency [Hz], relative level [dB per Hz])
CHALK_SPECTRUM = [(200, -37), (900, -14.5), (2200, -16.5), (2700, -30.5), (3300, -35), (4400, -24.5),
                  (7500, -18), (9000, -8), (10500, -5), (12500, -12.5), (14000, -11), (15500, -4)]
HEAP_SPECTRUM = [(100, -31), (200, -10.5), (400, -10.5), (700, -9.5), (980, -1), (1400, -14), (2200, -14),
                 (3000, -17), (5000, -19.5), (9000, -49)]
# the clatter leans mostly to the right: (frequency [Hz], left minus right [dB])
CLATTER_LEAN = [(100, -1), (400, -5.5), (1000, -4), (2500, 1), (4500, -0.5), (6500, -4), (8700, -11),
                (11000, -13.5), (12500, -1.5), (13500, 3.5)]


def stirring(clatter_db=-35, rumble_db=-45.0, rumble_growth=0.7, chime_db=-55, uneven_db=1.26):
    """Pieces scuff in the treble, long ones chime lower, and the shifting heap drums on the glass."""
    slips = amp(uneven_db * wobble(rate=39))  # the heap gives way unevenly
    t = np.arange(SR // 20) / SR

    def scuff():
        onset = 1 - np.exp(-t / rng.uniform(.0002, .004))
        return onset * contact(t, t60=.03, ring_t60=.05, ring_db=-6)

    def tap():
        pitch = rng.lognormal(np.log(1000), .4, 1)
        tone = ring(t, pitch, np.array([-15]), t60=0.08)[:1]  # the same on both sides
        return crack(t, t60=0.012, alike=0.66) + tone

    def chime():
        return note(t, rng.uniform(3700, 6800), t60=.05)

    def leaning(x):
        return unit(filtered(x, lambda hz: sides(along(CLATTER_LEAN, hz))))

    def through_glass(x, spectrum):
        return leaning(colour(shifting_bowl(x), spectrum))

    scuffs = swarm(scuff, per_second=190, spread_db=14, rub_db=-9)
    taps = swarm(tap, per_second=300, spread_db=9.5, rub_db=-5.5, alike=0.27)
    chimes = swarm(chime, per_second=70, spread_db=12, rub_db=-30)
    clatter = following(clatter_db, 1) * through_glass(scuffs, CHALK_SPECTRUM)
    chiming = following(chime_db, 0.45) * leaning(chimes)
    rumble = following(rumble_db, rumble_growth) * through_glass(taps, HEAP_SPECTRUM)
    return slips * (clatter + chiming + rumble)


def scene(room_db=-20, knock_room_db=-11):
    """The bowl close by, the room behind it."""
    pieces = clinks() + rattles() + slides() + clacks() + stirring()
    blows = knocks(level_db=1.5)
    echo = room(amp(room_db) * pieces + amp(knock_room_db) * blows)
    around_bowl = echo + lingering_hiss(pieces)
    return pieces + blows + around_bowl + handling() + background() + faint_tones()


def record(dry, top_hz=15400):
    """Rounds off the loudest peaks and cuts steeply above the band limit."""
    rounded = dry / (1 + (dry / .9) ** 4) ** .25
    return filtered(rounded, lambda hz: 1 / np.sqrt(1 + (hz / top_hz) ** 160))


dry = scene()
out = record(dry)
master(out)
```